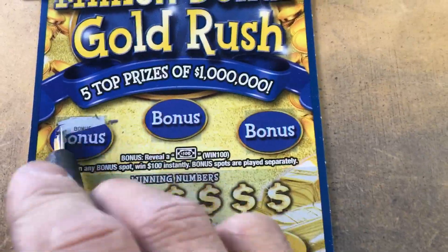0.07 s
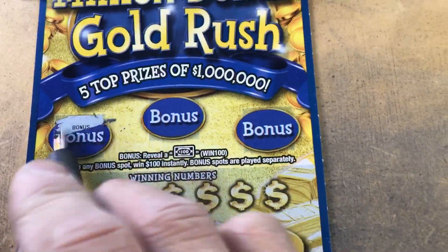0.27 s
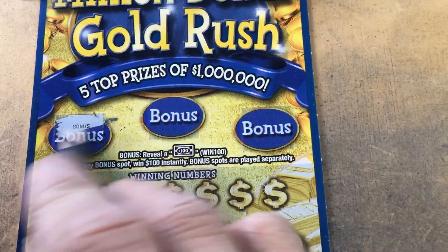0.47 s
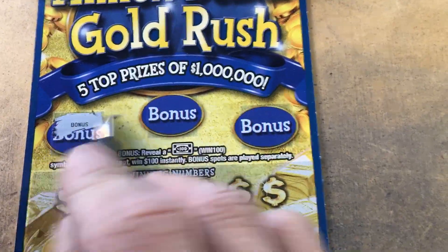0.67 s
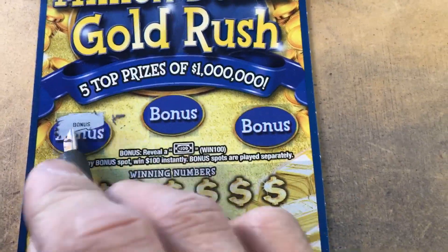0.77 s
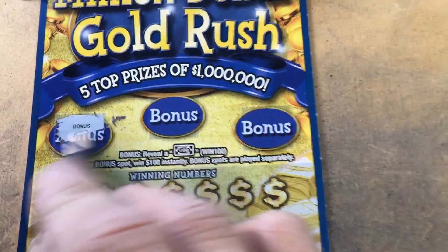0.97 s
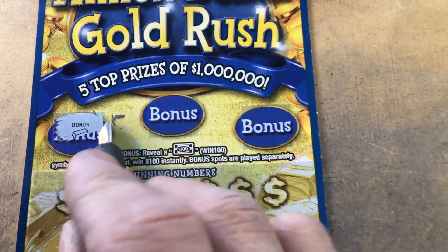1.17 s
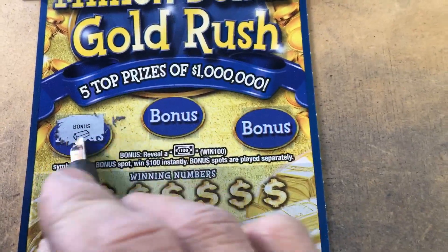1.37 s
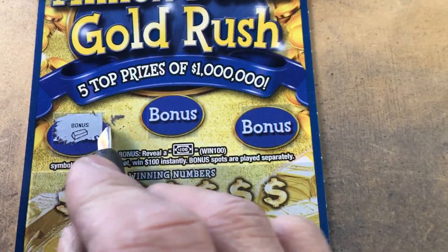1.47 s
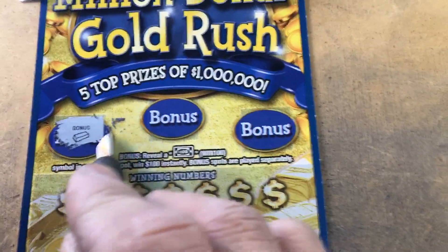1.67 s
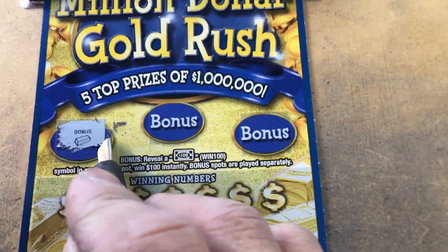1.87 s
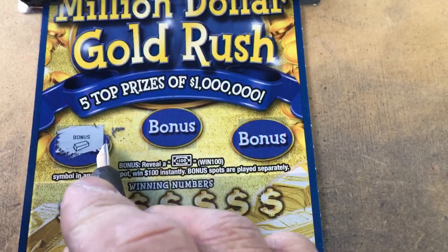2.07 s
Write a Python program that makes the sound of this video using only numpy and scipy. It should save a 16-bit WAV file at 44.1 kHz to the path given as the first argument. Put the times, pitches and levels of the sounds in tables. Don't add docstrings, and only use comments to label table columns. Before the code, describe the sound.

Quick scratching on a card lying on a table, stronger pushes alternating with softer pulls, flakes ticking, low table rumble beneath; scraping stops and quiet room noise remains, heard very close and dry.

```python
import sys
import numpy as np
from scipy import signal
from scipy.io import wavfile
from scipy.ndimage import uniform_filter1d

SR = 44100
rng = np.random.default_rng(int(sys.argv[2]) if len(sys.argv) > 2 else 0)


def rack_gain(trim_db):
    fader = np.asarray(trim_db, float)
    return 10 ** (fader / 20)


def put_to_file(sound):
    columns = np.atleast_2d(sound).T
    safe = np.clip(columns, -1, 1)
    whole_steps = np.round(safe * 32767)
    wavfile.write(sys.argv[1], SR, whole_steps.astype(np.int16))


N = 94021

# start_s, length_s, force_db, card_share_db, heaviest_place (0-1)
PUSH_STROKES = [
    (.080, 0.068, -25.5, 3, 0.5),
    (.272, 0.062, -31, 5, 0.7),
    (.477, 0.035, -27.5, 3, 0.27),
    (.633, 0.056, -27.5, 1.5, 0.47),
    (.804, 0.048, -27, 1.5, 0.6),
    (.985, 0.03, -29, 5.5, 0.26),
    (1.116, 0.055, -30, 4, 0.39),
    (1.270, 0.052, -29.5, 1, 0.49),
    (1.424, 0.046, -29.5, 3.5, 0.48),
    (1.576, 0.046, -27.5, 1.5, 0.46),
]
# start_s, length_s, force_db, card_share_db, bite_place (0-1)
PULL_STROKES = [(-.03, 0.048, -28.5, -1.5, 0.54), (.175, 0.054, -31.5, -1.5, 0.1),
                (.226, .014, -37, 6, .05), (.364, 0.046, -30, -2.5, 0.3), (.545, 0.044, -34.5, 2, .45),
                (.715, 0.041, -27.5, 2, .54), (.878, 0.045, -32.5, 1, 0.37), (1.043, 0.039, -34, 3.5, 0.24),
                (1.200, 0.038, -36, 3, 0.25), (1.351, 0.036, -31.5, 2, 0.54),
                (1.503, 0.033, -33.5, -0.5, 0.38), (1.650, 0.036, -33.5, 3, 0.59)]
# start_s, length_s, force_db, card_share_db, heaviest_place (0-1)
FAINT_DRAGS = [
    (.44, 0.035, -56, 15.5, 0.98),
    (.958, 0.018, -47.5, 6, 1),
    (1.73, 0.04, -67.5, 2, 0.31),
    (1.80, 0.012, -66, 13, 0.4),
    (1.86, 0.024, -99, 15, 0.41),
    (1.95, 0.046, -66, 8, .5),
    (1.99, 0.005, -61, 10.5, 0.6),
    (2.03, 0.029, -77, 13, .5),
]
# rise_s, release_s, fall_before_heaviest_db, fall_after_db, trailing_share (0-1), trailing_s
PUSH_ENVELOPE = (0.0016, 0.0039, 3.85, 11, 0.15, 0.01)
PULL_ENVELOPE = (0.0037, 0.0045, 12, 1.64, 0.2, 0.015)
DRAG_ENVELOPE = (0.0044, 0.0045, 11, 2.3, .2, .004)
# pitch_hz, width_hz, push_db, pull_db, near_to_far_db
TOOL_AND_CARD_MODES = [(286, 54, -17, -19, -9.5), (591, 31.3, -11.5, -3, 2.5), (1116, 53, -7, -6.5, 1.5),
                       (1386, 25.3, -1.5, 4, 14), (1549, 163, -10, -18, 14), (1749, 10.7, -1.5, 3, 2),
                       (2372, 28, -5, -3, 17.5), (2673, 40, -9, -6.5, -12.5), (3107, 21, -7.5, -4.5, 3.5),
                       (3505, 60, 0.5, 0.5, -5), (4207, 166, -8.5, -3, 6), (5635, 150, -9, -9.5, -14),
                       (6098, 90, -3, 0, 2), (7016, 370, -8, 0, -7.5)]
# pitch_hz, width_hz, push_db, pull_db, near_to_far_db
TIP_MODES = [(7820, 230, -16, -8, -8), (8420, 410, -9, -11, 0), (10080, 490, -14, -15.5, 0.5),
             (12680, 340, -12, -9, -10.5), (13230, 500, -15, -17.5, 2)]
# pitch_hz, level_db (per Hz)
PUSH_GRIT = [(150, -46), (800, -41.5), (1500, -14), (5000, -18), (7000, -19.5), (9000, -20.5),
             (11800, -23.5), (15500, -24.5)]
# pitch_hz, level_db (per Hz)
PULL_GRIT = [(150, -9.5), (800, -24), (1500, -13), (5000, -21.5), (7000, -5.5), (9200, -26.5),
             (11800, -21.5), (15500, -21.5)]
# pitch_hz, level_db
RUB_SPECTRUM = [(100, -52), (160, -4.5), (400, -1.5), (900, -4.5), (2500, -17.5), (5000, -18), (10000, -45)]
# start_s, level_db, burst_length_s, thump_db
CATCHES_AND_SNAPS = [(0.01, -41, 0.0019, -53.5), (0.0792, -41, 0.0039, -74), (0.181, -37, 0.0022, -60),
                     (0.258, -78, 0.0017, -49), (0.475, -37, 0.0035, -58), (0.7405, -33, 0.006, -45),
                     (0.842, -45, 0.0026, -61), (0.961, -46, .004, -42), (0.982, -31, 0.006, -44),
                     (1.2135, -33, 0.003, -47), (1.235, -35, 0.0025, -44.5), (1.372, -46, .002, -46),
                     (1.4245, -25.5, 0.0051, -49.5), (1.652, -45, 0.0017, -41.5), (1.677, -29, 0.0048, -36.5),
                     (0.1, -51, 0.0018, -74), (0.113, -33, 0.0039, -62), (0.142, -42, 0.0017, -65),
               (.366, -53, .003, -60), (0.446, -58, .002, -50), (.568, -29, 0.0023, -62),
               (0.713, -52, 0.0023, -46), (0.802, -42, .003, -68), (0.84, -45, 0.0037, -62),
               (1.068, -34, 0.0037, -67), (1.117, -34, 0.004, -47), (1.278, -25.5, 0.0037, -48),
               (1.3565, -47, .002, -45), (1.387, -42, .002, -66), (1.505, -50, 0.0014, -48),
               (1.517, -41, 0.0034, -43), (1.5795, -38, .003, -60), (1.609, -27, .002, -60)]
# pitch_hz, level_db
BURST_SPECTRUM = [(500, -45), (2000, -12), (6300, 1.5), (9000, -1), (15500, -11.5)]
# pitch_hz, level_db
THUMP_SPECTRUM = [(80, -25), (200, 5.5), (600, -1), (1500, -9), (5000, -48)]
# pitch_hz, t60_s
ROOM_DECAY = [(300, 0.34), (2000, 0.083), (8000, 0.084)]
# time_s, low_mode_db, upper_mode_db
TABLE_SHAKE = [(0.0, -55, -49.5), (0.05, -54, -46.5), (0.36, -50, -46), (0.57, -37.5, -52.5),
               (0.95, -41, -38.5), (0.999, -31.5, -50), (1.04, -42.5, -36), (1.51, -44, -53),
               (1.6, -42, -44), (1.66, -62, -53), (1.78, -34, -55), (1.829, -66, -58), (1.9, -40, -49.5),
               (2.03, -51, -59), (2.061, -41.5, -73), (2.13, -44, -45.5)]
# time_s, pitch_hz
ARM_LEAN = [(0, 88), (.15, 96.3), (.27, 79.4), (.42, 80.9), (.55, 98.2), (.86, 96.3), (1.06, 85.03),
            (2.13, 83)]
# pitch_hz, level_db (per Hz)
AIR_SPECTRUM = [(100, 2), (135, 1.5), (200, -10), (300, -9), (500, -19.5), (1700, -25), (2300, -34),
                (16000, -47)]
# onset_s, time_s where the falling slope would be full, end_s
SETTLE_TIMES = (1.747, 1.674, 1.775)
# pitch_hz, level_db
SETTLE_SPECTRUM = [(100, -44), (160, 1), (300, 2.5), (700, -13.5), (2500, -51), (6000, -42)]

ALL_MODES = TOOL_AND_CARD_MODES + TIP_MODES
CARD_BELOW_HZ = 3000
CREEP_GAIN, BITE_S, TRAIL_FADE_S = 0.55, 0.003, 0.005
CLICKS_PER_S, CLICK_SPREAD_DB, HISS = 3000, 3, 1
CHATTER_DB, CHATTER_S = 0.5, 0.0026
GRIT_BRIGHT_HZ = 2830
GRIT_BITE, GRIT_LOW_BITE, GRIT_LEAN_DB = 1.4, 0.74, -13
BITE_PER_OCTAVE = 0.62
WANDER_DB, WANDER_S = 1.5, 0.022
DRIFT, DRIFT_S = 0.004, 0.064
HAND_DAMPING, DAMP_S = 1.35, 0.002
RUB_DB, RUB_S = -6, 0.055
ROOM_DB, AIR_DB, SETTLE_DB = -15.5, -52, -41.5
SHAKE_HZ, SHAKE_WIDTH_HZ, THUD_HZ, THUD_DB = 64.4, 17.5, 45.1, -51.5
MIC_EDGE_HZ = 15760


def evened(x):
    return x / np.sqrt(np.mean(x ** 2) + 1e-20)


def smoothed_twice(x, span):
    return uniform_filter1d(uniform_filter1d(x, span), span)


def wander(seconds, count):
    span = max(int(seconds * SR), 1)
    return evened(smoothed_twice(rng.standard_normal((count, N)), span))


def read(points, hz):
    table_hz, value = np.transpose(points)
    return np.interp(np.log(hz + 1), np.log(table_hz + 1), value)


def colour(x, points):
    hz = np.abs(np.fft.fftfreq(4096, 1 / SR))
    log_gain = np.log(rack_gain(read(points, hz)))
    taps = np.fft.ifft(np.exp(np.conj(signal.hilbert(log_gain)))).real[:2048]
    return signal.oaconvolve(x, taps)[:len(x)]


def ring(x, hz, width):
    turn = np.exp(2j * np.pi * np.cumsum(hz) / SR)
    r = np.exp(-np.pi * width / SR)
    smooth = signal.lfilter([1 - r], [1, -r], x / turn + 1e-18)
    return 2 * (turn * smooth).real


def motion(strokes, envelope, outward):
    rise_s, release_s, before_db, after_db, trail, trail_s = envelope
    t = np.arange(N) / SR
    force, share, place, card_db = np.zeros((4, N))
    for start, length, db, share_db, top in strokes:
        on = slice(max(int(start * SR) + 1, 0), None)
        u = (t[on] - start) / length
        top = np.clip(top, .05, .95)
        rest = (np.minimum(u, 1) - top) / (1 - top)
        if outward:
            fall_db = np.where(u < top, before_db * (1 - u / top) ** 2, after_db * rest ** 2)
        else:
            fall_db = np.where(u < top, before_db * (1 - CREEP_GAIN * u / top), after_db * (1 - rest))
            fall_db = uniform_filter1d(fall_db, max(int(BITE_S * SR), 1))
        past = np.clip(u - 1, 0, None) * length
        fade = past / (2 * trail_s) + np.clip(past - trail_s, 0, None) / TRAIL_FADE_S
        trailing = np.clip(trail, 0, 1) * np.exp(-fade)
        rise = np.clip(u * length / rise_s, 0, 1)
        share[on] = rack_gain(-fall_db) * rise * np.maximum(np.exp(-past / release_s), trailing)
        force[on] = rack_gain(db) * share[on]
        place[on] = (np.minimum(u, 1) - .5) * (1 if outward else -1)
        card_db[on] = share_db
    return force, share + 1e-9, place, card_db


def breaking_grit(force):
    struck = rng.random(N) < CLICKS_PER_S / SR
    size = np.minimum(rng.exponential(1, N), 3)
    clicks = rng.choice([-1., 1.], N) * rack_gain(CLICK_SPREAD_DB * size) * struck
    hiss = rng.standard_normal(N)
    chatter = rack_gain(CHATTER_DB * wander(CHATTER_S, count=1)[0])
    return force * chatter * evened(evened(clicks) + HISS * hiss)


def bare_grit(drive, share, place, card_db, spectrum):
    low = signal.lfilter(*signal.butter(2, GRIT_BRIGHT_HZ, fs=SR), drive)
    dull = low * share ** (GRIT_LOW_BITE - 1) * rack_gain(card_db / 2)
    bright = (drive - low) * share ** (GRIT_BITE - 1) * rack_gain(GRIT_LEAN_DB * place)
    return colour(dull + bright, spectrum)


def ringing_modes(drive, share, place, card_db, outward):
    coupling_db = WANDER_DB * np.tanh(wander(WANDER_S, count=len(ALL_MODES)))
    grip = 1 + DRIFT * np.tanh(wander(DRIFT_S, count=len(ALL_MODES)))
    pressed = np.minimum(share * 3, 1)
    k = 1 / (DAMP_S * SR)
    damp = np.maximum(signal.lfilter([k], [1, k - 1], pressed) ** 0.88, pressed)
    out = np.zeros(N)
    for i, (hz, width, push_db, pull_db, lean_db) in enumerate(ALL_MODES):
        db = (push_db if outward else pull_db) + lean_db * place + coupling_db[i]
        db = db + card_db * (hz < CARD_BELOW_HZ)
        bite = share ** (BITE_PER_OCTAVE * np.log2(0.1 + hz / 2000))
        tone = ring(drive * rack_gain(db) * bite, hz * grip[i], width * HAND_DAMPING)
        out += (-1) ** i * damp * tone / HAND_DAMPING ** .5
    return out


def scrape(strokes, envelope, outward):
    force, share, place, card_db = motion(strokes, envelope, outward)
    drive = breaking_grit(force)
    out = bare_grit(drive, share, place, card_db, PUSH_GRIT if outward else PULL_GRIT)
    out += ringing_modes(drive, share, place, card_db, outward)
    rub = smoothed_twice(force, int(RUB_S * SR)) * colour(rng.standard_normal(N), RUB_SPECTRUM)
    return rack_gain(13.5) * out + rack_gain(RUB_DB) * rub


def table():
    t = np.arange(N) / SR
    s, low_db, upper_db = np.transpose(TABLE_SHAKE)
    upper_hz = np.interp(t, *np.transpose(ARM_LEAN))
    out = np.zeros(N)
    for hz, db, wide in [(SHAKE_HZ, low_db, 1), (upper_hz, upper_db, 1.3), (THUD_HZ, THUD_DB, 2.5)]:
        a, b, c = wander(1 / (wide * SHAKE_WIDTH_HZ), count=3)
        phase = 2 * np.pi * np.cumsum(hz + 2.53 * wide * c) / SR
        sway = (1 + .3 * a) * np.cos(phase) + .3 * b * np.sin(phase)
        out += rack_gain(np.interp(t, s, db + 0 * s)) * evened(sway)
    return out


def air():
    swell = evened(smoothed_twice(rng.standard_normal(N), 1500))
    noise = colour(rng.standard_normal(N + 2048), [(60, -47)] + list(AIR_SPECTRUM))[2048:]
    return rack_gain(AIR_DB) * rack_gain(0.31 * swell) * evened(noise)


def catches_and_snaps():
    t = np.arange(N) / SR
    bright, dull = np.zeros((2, N))
    for s, db, length, thump_db in CATCHES_AND_SNAPS:
        after = np.clip(t - s, 0, None)
        bright += rack_gain(db) * np.minimum(after / 0.00055, 1) * np.exp(-after / length)
        dull += rack_gain(thump_db) * np.minimum(after / 0.0025, 1) * np.exp(-after / 0.0065)
    a, b = rng.standard_normal((2, N))
    return rack_gain(3.0) * colour(bright * a, BURST_SPECTRUM) + rack_gain(21.5) * colour(dull * b, THUMP_SPECTRUM)


def room(x):
    hz, t, z = signal.stft(rng.standard_normal(SR // 4), SR, nperseg=256)
    decay = rack_gain(-60 * t / read(ROOM_DECAY, hz)[:, None])
    tail = signal.istft(z * decay, SR, nperseg=256)[1]
    return rack_gain(ROOM_DB) * signal.fftconvolve(x, tail / np.linalg.norm(tail))[:N]


def settle():
    swell = np.interp(np.arange(N) / SR, SETTLE_TIMES, [0, 1, 0])
    return rack_gain(SETTLE_DB) * swell * evened(colour(rng.standard_normal(N), SETTLE_SPECTRUM))


def scene():
    tip = scrape(PULL_STROKES, PULL_ENVELOPE, outward=False)
    tip += scrape(PUSH_STROKES, PUSH_ENVELOPE, outward=True)
    tip += scrape(FAINT_DRAGS, DRAG_ENVELOPE, outward=True)
    tip += catches_and_snaps()
    return (tip + room(tip) + table() + air() + settle())[None]


def roll_off(x):
    return signal.sosfilt(signal.butter(12, 16620, fs=SR, output="sos"), x)


def record(dry):
    dry = .3 * np.tanh(dry / .3)
    taps = signal.firwin(511, MIC_EDGE_HZ, window=("kaiser", 6), fs=SR)
    limited = signal.oaconvolve(dry, taps[None], "same")
    return roll_off(limited + rack_gain(-50) * (dry - limited))


dry = scene()
out = record(dry)
put_to_file(out)
```